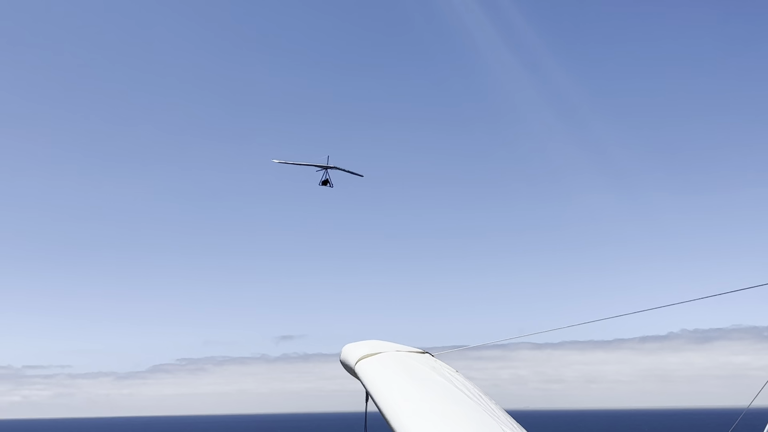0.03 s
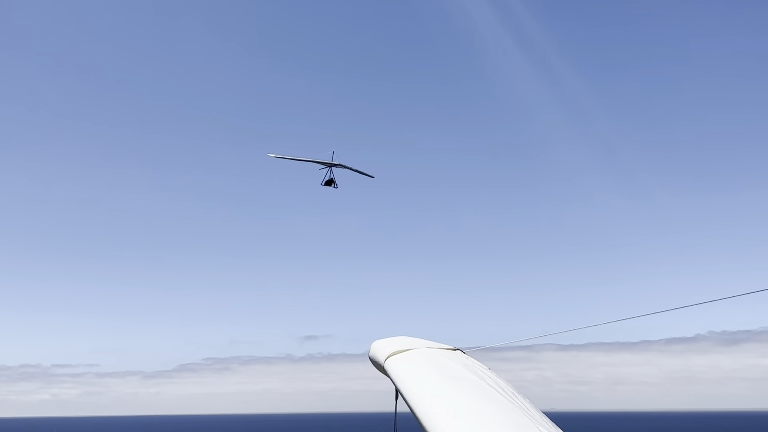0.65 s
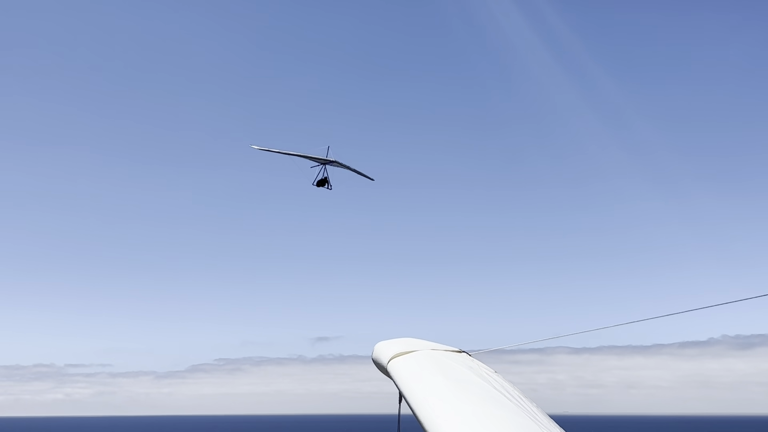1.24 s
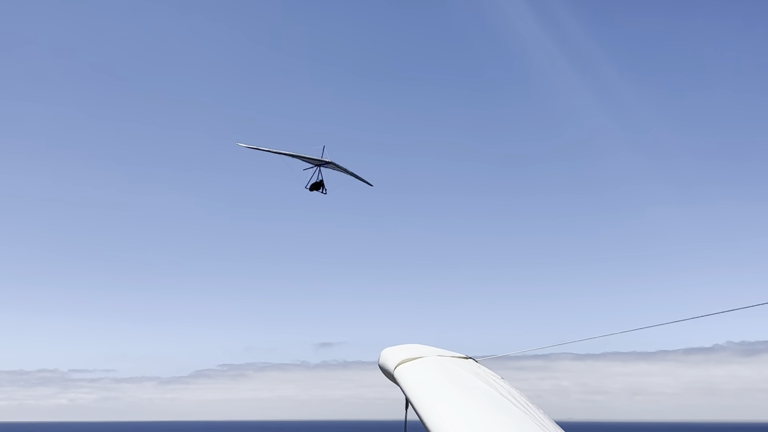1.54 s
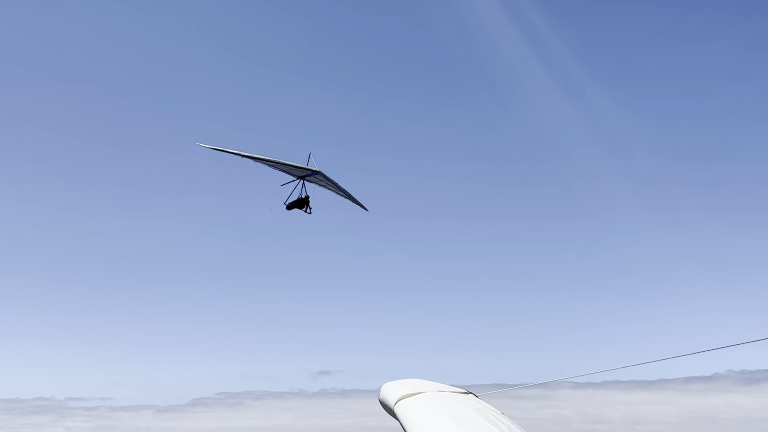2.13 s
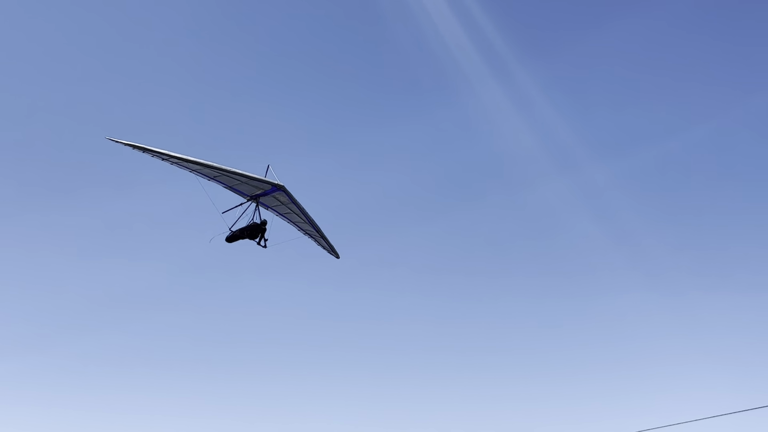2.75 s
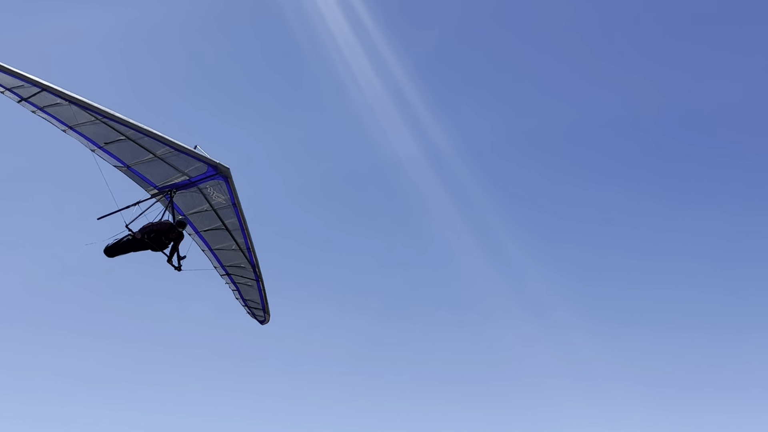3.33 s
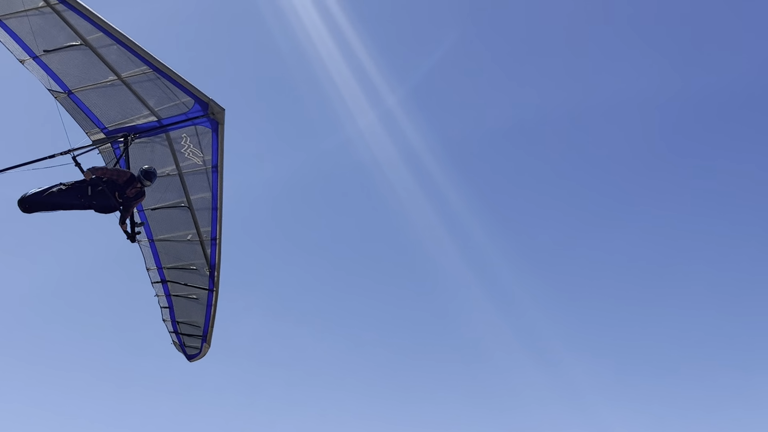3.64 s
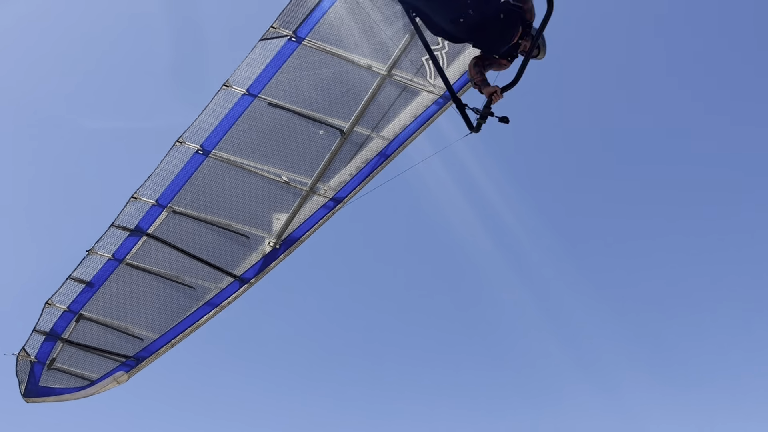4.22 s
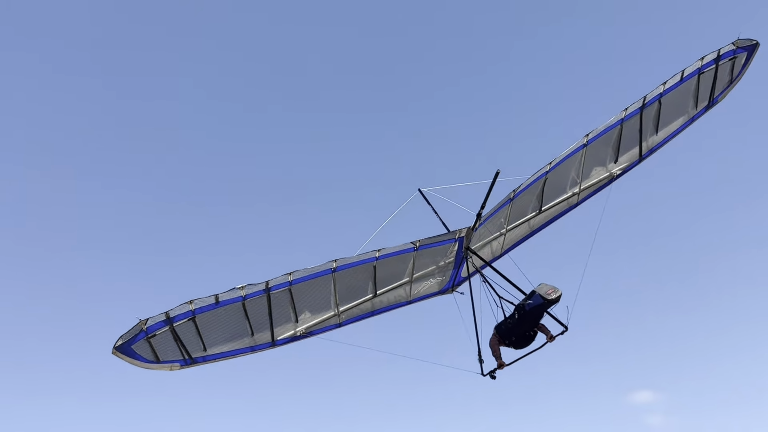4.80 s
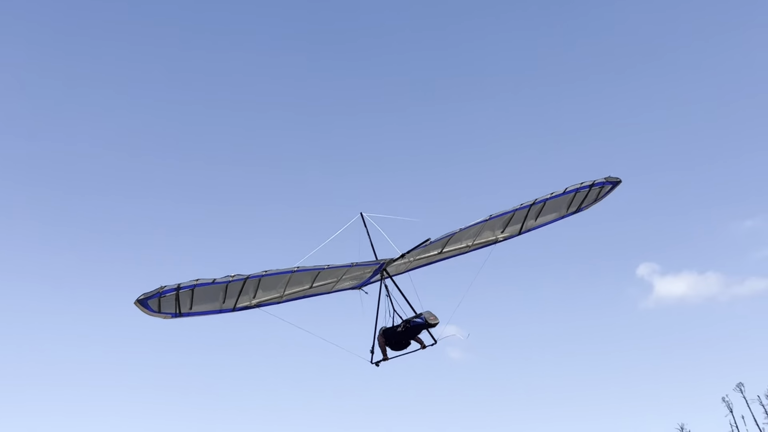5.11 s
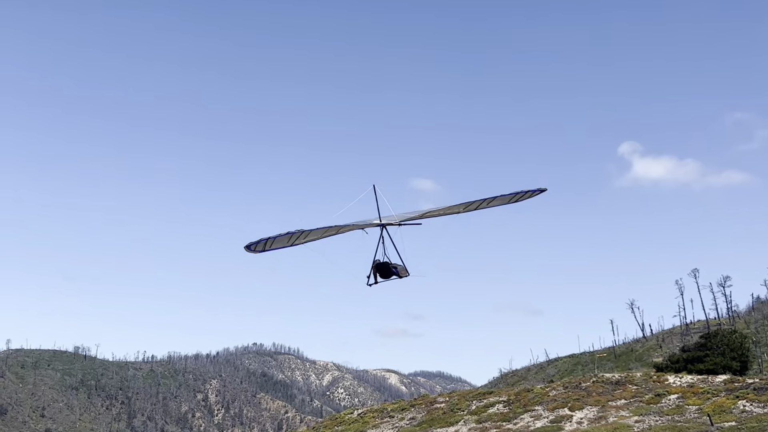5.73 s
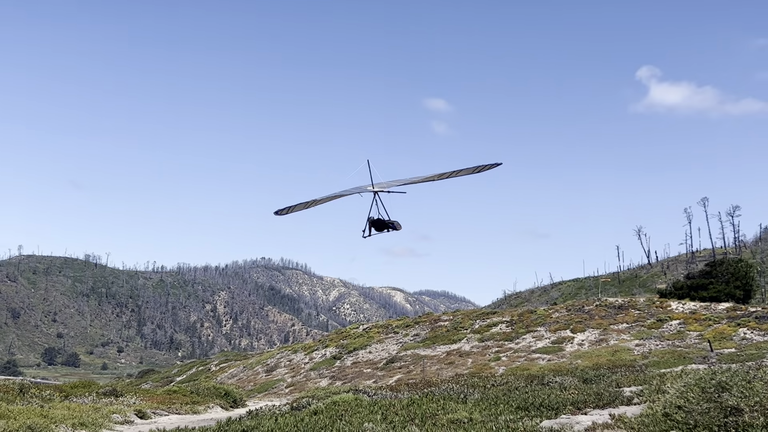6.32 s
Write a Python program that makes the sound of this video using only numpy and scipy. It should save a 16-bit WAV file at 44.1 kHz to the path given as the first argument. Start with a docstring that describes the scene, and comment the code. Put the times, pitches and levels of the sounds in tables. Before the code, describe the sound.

Wind buffets the microphone throughout, a low rumble with irregular flutters and soft thumps, over a very faint, steady wash of distant surf and wind in the scrub. The gusts are moderate at first, with a sharper one near 1.7 seconds. From about 2 seconds a thin, breathy whistle from a hang glider's wires slowly emerges. An airy rush from its sail swells from 3 seconds and peaks close overhead around 4 seconds, where the whistle is clearest and slides slightly down in pitch. Both fade by about 5.5 seconds, leaving a softer rush of trailing air. Faint, high ticks and chinks of loose fittings are scattered from 4.5 seconds on. The wind grows rougher after the pass and is the loudest sound, with hard slaps and short roars near 4.3, 4.9, 5.5 and 6 seconds, still blowing at the end around 6.5 seconds.

```python
"""Hang glider over a windy coast

A hang glider swoops low over a phone on a hillside and sails off inland. Its wires shed vortices
and sing, falling in pitch as it passes; its sail rushes and hisses; loose fittings chink.
Gusts buffet the microphone ports ever harder, over distant surf and wind in the scrub."""
import sys
import numpy as np
from scipy import signal
from scipy.fft import rfft, irfft, next_fast_len
from scipy.io import wavfile
from scipy.ndimage import uniform_filter1d

SR = 44100
rng = np.random.default_rng(int(sys.argv[2]) if len(sys.argv) > 2 else 0)


def wav_record(signal):
    """Record a signal, one row per channel, as 16-bit PCM in the file named by sys.argv[1]."""
    frames = np.transpose(np.atleast_2d(signal))
    bounded = np.clip(frames, -1, 1)
    # unit amplitude maps onto the largest positive 16-bit level
    quanta = np.round(bounded * 32767).astype(np.int16)
    wavfile.write(sys.argv[1], SR, quanta)


N = 289296
TIME = np.arange(N) / SR
OVERHEAD_S = 4
GUST_EDGE = 2.76  # swell shape: 2 is a bell, higher is more abrupt

# stereo width of sail and wake: (frequency [Hz], relative side level [dB])
GLIDER_WIDTH = [(60, -15.5), (700, -12), (1300, -12.5), (2400, -18.5), (4500, -9.5), (8500, -4),
                (15000, -5)]


def undb(db):
    """Decibels to gain."""
    return 10 ** (np.asarray(db) / 20)


def curves(table):
    """Columns of a timed table, interpolated per sample."""
    s, *columns = np.transpose(table)
    return [np.interp(TIME, s, c) for c in columns]


def unit(x):
    """Scale to rms 1."""
    return x / np.sqrt(np.mean(x ** 2))


def even(x, span_s):
    """Hold the rms near 1 over each span; faster grain stays."""
    span = int(span_s * SR)
    power = uniform_filter1d(np.atleast_2d(x) ** 2, span + 1).mean(axis=0)
    return x / np.sqrt(uniform_filter1d(power, span // 2 + 1) + 1e-18)


def walk(rate_hz):
    """Smooth random wander, rms 1."""
    span = max(int(SR / rate_hz), 1)
    drift = uniform_filter1d(rng.standard_normal(N), span, mode="wrap")
    return unit(uniform_filter1d(drift, span, mode="wrap"))


def swell(s, length_s, edge=2, t=TIME):
    """Rise and fall, peak 1 at s, within 3 dB for length_s."""
    return 2 ** (-np.minimum(np.abs(2 * (t - s) / length_s), 10) ** edge / 2)


def shaped(x, spectrum, size):
    """FFT filter through (Hz, dB) points, joined in log frequency."""
    hz, db = np.transpose(spectrum)
    bins_hz = np.maximum(np.fft.rfftfreq(size, 1 / SR), 1)
    gain = undb(np.interp(np.log(bins_hz), np.log(hz), db))
    return irfft(rfft(x, size) * gain, size)[..., :N]


def colour(x, spectrum):
    """Impose a spectrum, rms 1."""
    return unit(shaped(x, spectrum, next_fast_len(N + 8192)))


def dipped(x, dips):
    """Carve bell-shaped dips into the spectrum."""
    size = next_fast_len(N + 8192)
    bins_hz = np.fft.rfftfreq(size, 1 / SR)
    db = sum(dip_db * np.exp(-((bins_hz - hz) / width_hz) ** 2) for hz, width_hz, dip_db in dips)
    return irfft(rfft(x, size) * undb(db), size)[:N]


def stereo(mid, side, side_db):
    """Mid and side to left and right, rms 1."""
    return unit(mid + undb(side_db) * side * np.array([[1], [-1]]))


def air(side_db):
    """Stereo white noise."""
    return stereo(*rng.standard_normal((2, N)), side_db)


def ambience(spectrum, width):
    """Coloured noise with frequency-dependent stereo width."""
    mid, side = rng.standard_normal((2, N))
    return colour(stereo(mid, shaped(side, width, N), side_db=5.5), spectrum)


def burst(decay_s, low_hz, high_hz, side_db, order):
    """Short puff of band noise, mid peak 1."""
    age = TIME[:SR // 5] / max(decay_s, .001)
    puff = stereo(*rng.standard_normal((2, len(age))), side_db) * age * np.exp(-2 * age)
    band = signal.butter(order, [low_hz, min(high_hz, .45 * SR)], "band", fs=SR, output="sos")
    puff = signal.sosfilt(band, puff)
    return puff / np.abs(puff.mean(axis=0)).max()


def add(out, s, sound):
    """Mix a sound in at time s."""
    start = int(max(s, 0) * SR)
    out[:, start:start + sound.shape[1]] += sound[:, :N - start]


def airflow():
    """Rumble and flutter gains at the ports: gusts add their power to the breeze."""
    # steady wind: (time [s], rumble [dB], flutter [dB])
    breeze = [(0, -60, -78), (.5, -38.5, -62), (.7, -46.5, -58.5), (1.1, -40.5, -54), (1.3, -41.5, -54),
              (2.3, -35, -59), (3.0, -38, -63), (3.38, -40.5, -51), (3.6, -37, -44), (4.4, -35.5, -51),
              (4.9, -29, -49), (5.15, -35, -68), (5.45, -35, -51), (5.65, -27.5, -32), (5.9, -27, -36.5),
              (6.3, -28.5, -38), (6.56, -21, -33.5)]
    # gusts: (time [s], length [s], rumble [dB], flutter [dB])
    gusts = [(0.086, 0.033, -35, -59), (0.245, 0.06, -38, -45), (0.358, 0.06, -31.5, -41),
             (.865, 0.089, -36.5, -49.5), (0.968, 0.079, -40, -50), (1.076, 0.059, -38, -48),
             (1.49, 0.065, -34, -39.5), (1.705, 0.07, -40, -38.5), (1.753, 0.045, -30.5, -32),
             (1.874, 0.081, -32, -47), (2.111, 0.033, -32, -35.5), (2.206, 0.044, -34, -41),
             (2.32, 0.043, -51, -39), (2.445, 0.091, -28.5, -39), (2.597, 0.062, -31, -36),
             (2.719, 0.07, -32, -38.5), (3.175, 0.075, -32.5, -47.5), (3.478, 0.029, -31.5, -34.5),
             (3.7, 0.035, -29, -34), (3.79, 0.033, -38, -35), (3.91, 0.1, -30, -68),
             (4.046, 0.064, -32, -32.5), (4.163, 0.066, -28.5, -32.5), (4.248, 0.018, -34, -37),
             (4.315, 0.04, -24.5, -25.5), (4.6, 0.14, -24.5, -32), (4.78, 0.07, -23.5, -24.5),
             (4.885, 0.082, -20.5, -25), (4.987, 0.066, -25.5, -29.5), (5.095, 0.025, -27, -38),
             (5.259, 0.072, -28.5, -33.5), (5.399, 0.02, -32, -33.5), (5.515, 0.022, -18, -20),
             (5.56, 0.062, -23.5, -27), (5.833, 0.092, -25, -36.5), (6.026, 0.022, -25.5, -29),
             (6.131, 0.044, -23.5, -29.5), (6.395, 0.05, -30, -31.5)]
    t = TIME[::20]
    rumble_power, flutter_power = undb(curves(breeze))[:, ::20] ** 2
    for s, length_s, rumble_db, flutter_db in gusts:
        gust = swell(s, length_s, GUST_EDGE, t)
        rumble_power += (undb(rumble_db) * gust) ** 2
        flutter_power += (undb(flutter_db) * gust) ** 2
    return np.interp(TIME, t, np.sqrt(rumble_power)), np.interp(TIME, t, np.sqrt(flutter_power))


def wind(rumble_gain, flutter_gain):
    """Large eddies rumble on the ports, small ones flutter in clumps; both throb together."""
    # large eddies: (frequency [Hz], relative density [dB])
    rumble_spectrum = [(20, -25), (35, -14), (50, 3), (75, 3), (110, -1.5), (170, -6.5), (250, -12.5),
                       (400, -25), (800, -68), (1600, -78), (6000, -100)]
    # small eddies: (frequency [Hz], relative density [dB])
    flutter_spectrum = [(60, -24), (150, -3.5), (280, 3), (420, 0), (600, -8), (800, -18), (1100, -27),
                        (1400, -27.5), (1700, -50.5), (2500, -41.5), (6000, -79), (15000, -100)]
    # eddy size: (time [s], relative weight of the deepest rumble [dB])
    depth = [(0, 3.5), (1.8, 0.5), (2.9, 0.5), (3.4, -15), (4.4, -8), (4.8, -2.5), (6.56, -6.5)]
    depth_db, = curves(depth)
    swirl = colour(air(side_db=-9) * undb(2.66 * walk(110)), rumble_spectrum)
    deep = signal.sosfiltfilt(signal.butter(2, 70, fs=SR, output="sos"), swirl)
    rumble = even(swirl + (undb(depth_db) - 1) * deep, span_s=.066)
    clumps = undb(2.8 * walk(180))
    flutter = even(colour(air(side_db=-8) * clumps, flutter_spectrum), span_s=.12)
    throb = walk(36)
    return rumble * rumble_gain * undb(1.65 * throb) + flutter * flutter_gain * undb(3 * throb)


def surf():
    """Distant breakers and wind in the scrub: a near-steady wash."""
    # wash: (frequency [Hz], relative density [dB])
    spectrum = [(30, -1.5), (150, 2.5), (400, -16), (700, -14.5), (1100, -12), (1550, -14), (2100, -9.5),
                (3200, -14.5), (5000, -22), (8000, -27.5), (12000, -56.5), (15500, -42)]
    # stereo width: (frequency [Hz], relative side level [dB])
    width = [(60, -8.5), (350, 2.5), (700, 11), (1250, 3), (2300, -20), (5000, -6.5), (8500, -3.5),
             (15000, -11)]
    return ambience(spectrum, width) * undb(-55 + .5 * walk(.76) + .5 * walk(15))


def sing(pitch_hz, width_hz):
    """Vortex tone: narrow-band noise on a steady or moving pitch."""
    lowpass = signal.butter(2, width_hz / 2, fs=SR, output="sos")
    baseband = signal.sosfilt(lowpass, air(side_db=-17) + 1j * air(side_db=-13))
    carrier = np.exp(2j * np.pi * np.cumsum(pitch_hz * np.ones(N)) / SR)
    return even(np.real(baseband * carrier), span_s=.047)


def wires():
    """Wires shed vortices and sing, clearest overhead, where one locks into a pure note."""
    # main wires: (time [s], shedding pitch [Hz], level [dB])
    song = [(0, 1541, -76), (1.1, 1536, -66), (2.0, 1549, -60.5), (2.55, 1659, -57), (3.25, 1647, -51.5),
            (3.63, 1585, -48), (3.75, 1560, -42.5), (3.86, 1535, -42.5), (3.97, 1520, -42),
            (4.07, 1560, -41), (4.12, 1490, -39), (4.16, 1442, -40.5), (4.21, 1435, -42),
            (4.27, 1400, -43.5), (4.39, 1363, -43.5), (4.49, 1417, -46), (4.68, 1384, -47.5),
            (5.0, 1415, -52.5), (6.56, 1531, -84)]
    far_share, near_share = .17, .72  # clear tone's part of the power
    lock_s, lock_db = 4.15, -39.5
    hz, db = curves(song)
    clear = far_share + (near_share - far_share) * swell(OVERHEAD_S, length_s=.6)
    sway = walk(10.92)  # uneven air moves pitch and level together
    hz, db = hz * (1 + .0045 * sway), db + .9 * sway
    taut = sing(hz * (1 + .005 * walk(28)), width_hz=85)
    bundle = sing(hz * .99, width_hz=160)
    slanted = sing(hz * .905, width_hz=200)  # slanted wires see slower air
    broad = undb(-2) * bundle + undb(-1.5) * slanted
    lock_phase = 2 * np.pi * np.cumsum(hz * (1 + .008 * walk(50))) / SR
    lock_gain = undb(lock_db + 2.5 * walk(45)) * swell(lock_s, length_s=.095, edge=GUST_EDGE)
    locked = np.sqrt(2) * np.sin(lock_phase) * lock_gain
    return locked + undb(db) * (np.sqrt(clear) * taut + np.sqrt(1 - clear) * broad)


def sail():
    """Turbulence off sail and harness peaks overhead; soft swells of wind in the scrub share its hiss."""
    # wind in the scrub: (time [s], length [s], level [dB])
    hisses = [(.22, 0.81, -54.5), (1.584, 0.75, -55), (5.8, 0.087, -49)]
    # rush: (frequency [Hz], relative density [dB])
    spectrum = [(40, -19.5), (200, 22.5), (550, 25.5), (900, 19.5), (1300, 16), (1700, 14.5), (2000, 5.5),
                (3200, 4.5), (5000, -1.5), (7500, -2.5), (12000, -11), (15500, -12)]
    rush_db, approach_s, leave_s = -41, .72, .75
    pass_s = 2 * np.where(TIME < OVERHEAD_S, approach_s, leave_s)
    near = undb(rush_db) * swell(OVERHEAD_S, pass_s, edge=1.76)
    far = sum(undb(db) * swell(s, length_s) for s, length_s, db in hisses)
    return ambience(spectrum, GLIDER_WIDTH) * np.hypot(near, far) * undb(.97 * walk(53))


def eddy(hz, pan_db):
    """One vortex crossing the ports: about two pressure cycles, arriving sharply, then slowing."""
    rise_cycles, fall_cycles = .52, 1
    half = int(3 * SR / hz)
    cycles = np.arange(-half, half) * hz / SR
    envelope = np.exp(-(cycles / np.where(cycles < 0, rise_cycles, fall_cycles)) ** 2)
    phase = 2 * np.pi * (cycles - .17 * cycles ** 2) + rng.uniform(0, 2 * np.pi)
    ports = np.array([[1], [-1]]) / 2
    lag_rad = rng.uniform(-.19, 1) * min(hz / 350, 2)  # reaches one port first
    return envelope * np.cos(phase + lag_rad * ports) * undb(pan_db * ports)


def buffets(flutter_gain):
    """Strong eddies slap the ports; tiny ones pop at random, scaled by the flutter."""
    # strong eddies: (time [s], peak [dB], centre [Hz])
    strikes = [(.174, -41, 735), (.217, -31.5, 415), (.331, -24.5, 398), (0.358, -28, 520),
               (.389, -27.5, 350), (.454, -33, 700), (0.846, -26.5, 283), (0.867, -29.5, 410),
               (0.888, -27, 260), (0.979, -30, 353), (1.075, -32.5, 410), (1.375, -32, 210),
               (1.486, -21.5, 376), (1.5, -20.5, 312), (1.653, -26.5, 433), (1.732, -20.5, 270),
               (1.74, -28.5, 1100), (1.743, -15, 624), (1.751, -18, 104), (1.767, -17, 95),
               (1.861, -27.5, 229), (2.013, -30, 330), (2.04, -23, 160), (2.091, -26, 285),
               (2.152, -30, 945), (2.167, -26.5, 256), (2.203, -26, 304), (2.222, -24.5, 168),
               (2.302, -33, 258), (2.43, -22, 312), (2.513, -20.5, 415), (2.521, -20, 96),
               (2.545, -26, 680), (2.554, -23, 278), (2.578, -29, 600), (2.68, -22, 460),
               (2.945, -30.5, 260), (3.125, -26.5, 190), (3.188, -26, 222), (3.478, -22, 418),
               (3.638, -23.5, 300), (3.657, -24, 250), (3.689, -19.5, 430), (3.707, -22, 480),
               (3.716, -14, 162), (3.776, -22, 380), (3.786, -20.5, 320), (3.852, -23, 277),
               (4.045, -22, 290), (4.137, -22.5, 280), (4.178, -21, 270), (4.292, -19, 440),
               (4.305, -8.5, 330), (4.308, -8.5, 159), (4.588, -20, 700), (4.734, -14, 453),
               (4.757, -12, 490), (4.785, -15, 401), (4.821, -10, 397), (4.837, -22, 1650),
               (4.838, -7.5, 437), (4.845, -6.5, 134), (4.855, -12, 720), (4.874, -13.5, 820),
               (4.888, -12, 405), (4.969, -20, 600), (4.975, -14.5, 330), (5.22, -15, 200),
               (5.23, -17.5, 90), (5.246, -20, 290), (5.256, -19, 560), (5.267, -15, 400),
               (5.274, -14, 105), (5.286, -22.5, 246), (5.384, -21.5, 520), (5.517, -9, 500),
               (5.522, -13, 680), (5.524, -9, 232), (5.539, -17.5, 320), (5.558, -14.5, 128),
               (5.566, -13, 370), (5.579, -19, 400), (5.679, -18, 790), (5.689, -17.5, 240),
               (5.707, -25, 620), (5.729, -23.5, 860), (5.748, -19.5, 473), (5.774, -19.5, 600),
               (5.79, -18, 340), (5.801, -13, 400), (5.81, -21, 253), (5.831, -24, 726),
               (5.841, -16.5, 293), (5.874, -20.5, 900), (5.966, -21.5, 760), (6.045, -14, 667),
               (6.048, -7.5, 400), (6.097, -15, 540), (6.112, -23, 600), (6.123, -16.5, 623),
               (6.133, -16, 400), (6.141, -16, 300), (6.195, -13, 454), (6.217, -25, 670),
               (6.355, -20.5, 560), (6.388, -15.5, 290), (6.397, -18, 600), (6.413, -22, 322),
               (6.498, -21.5, 260)]
    pop_floor_db, pop_range_db = -13, 20.5
    when, size, pitch, place = rng.random(size=(160, 4)).T
    at = (when * (N - 1)).astype(int)
    pop_gain = flutter_gain[at] * undb(pop_floor_db + pop_range_db * size ** 2)
    pops = zip(TIME[at], pop_gain, 550 + 550 * pitch, 14 * (place - .5))
    # smaller eddies favour one port more
    pans_db_per_hz = (.5 + 1.5 * rng.standard_normal(len(strikes))) / 506
    slaps = [(s, undb(db), hz, pan * hz) for (s, db, hz), pan in zip(strikes, pans_db_per_hz)]
    out = np.zeros((2, N))
    for s, gain, hz, pan_db in [*pops, *slaps]:
        slap = eddy(hz, pan_db)
        add(out, s - slap.shape[1] / 2 / SR, gain * slap)
    return out


def blasts():
    """In the hardest gusts, eddies crowd into a short roar."""
    # hardest gusts: (time [s], length [s], level [dB])
    gusts = [(0.33, 0.041, -54), (1.745, 0.026, -37), (2.564, 0.07, -44.5), (4.316, 0.018, -28.5),
             (4.756, 0.048, -34), (4.839, 0.032, -20.5), (4.886, 0.019, -16.5), (4.907, 0.058, -38),
             (5.541, 0.049, -33), (6.525, 0.049, -31.5)]
    # roar: (frequency [Hz], relative density [dB])
    spectrum = [(120, 3), (330, 4), (550, 3), (800, 1), (1150, -4), (1400, -23), (1900, -32), (4000, -57),
                (15000, -87.5)]
    roar = even(colour(air(side_db=-4.5), spectrum), span_s=.017)
    return roar * sum(undb(db) * swell(s, length_s, GUST_EDGE) for s, length_s, db in gusts)


def whistles():
    """Other wires sound briefly as the air meets them squarely."""
    # wire notes: (time [s], length [s], pitch [Hz], width [Hz], level [dB])
    notes = [(.73, 0.04, 1450, 600, -56), (4.547, 0.077, 1596, 110, -44.5), (5.36, 0.19, 1652, 200, -53.5)]
    return sum(sing(hz, width_hz) * undb(db) * swell(s, length_s)
               for s, length_s, hz, width_hz, db in notes)


def rustle():
    """Brief airy rustle with an early gust."""
    band_hz, level_db = [11250, 14750], -80
    band = signal.butter(2, band_hz, "band", fs=SR, output="sos")
    hiss = unit(signal.sosfilt(band, air(side_db=-12)))
    return hiss * undb(level_db) * swell(s=.86, length_s=.08)


def ticks():
    """Small fittings tick as the wires shift under load."""
    # rigging ticks: (time [s], peak [dB], ring [Hz], width [Hz], decay [s])
    hits = [(1.928, -61, 13100, 500, .006), (5.089, -56, 12800, 500, 0.0046),
            (5.198, -46.5, 4770, 900, 0.012), (5.236, -56, 7600, 900, 0.0065),
            (5.278, -37.5, 7700, 650, 0.0037), (5.279, -54, 13000, 1400, .003)]
    out = np.zeros((2, N))
    for s, db, hz, width_hz, decay_s in hits:
        tick = burst(decay_s, hz - width_hz / 2, hz + width_hz / 2, side_db=-2, order=1)
        add(out, s, undb(db) * tick)
    return out


def wake():
    """Turbulent air rushes on behind the wing."""
    # wake strength: (time [s], level [dB])
    levels = [(0, -104), (3.8, -64), (4.5, -50), (5.3, -48), (5.98, -40.5), (6.27, -46.5), (6.39, -44),
              (6.56, -49)]
    # wake rush: (frequency [Hz], relative density [dB])
    spectrum = [(300, -21), (700, 4.5), (1050, 6.5), (1400, -1.5), (1700, -7.5), (2100, -14), (3000, -40),
                (6000, -46.5)]
    level_db, = curves(levels)
    return ambience(spectrum, GLIDER_WIDTH) * undb(level_db + 2 * walk(42))


def thin_wire():
    """One thin wire pipes briefly overhead."""
    peak_s, peak_db, pitch_hz, half_length_s = 4.188, -58, 13350, .014
    envelope = np.exp(-((TIME - peak_s) / half_length_s) ** 2)
    return undb(peak_db) * envelope * np.sin(2 * np.pi * pitch_hz * TIME)


def rattle():
    """Loose fittings chatter after the pass: a few clear chinks, many faint, all on the same modes."""
    # clear chinks: (time [s], strike level [dB])
    chinks = [(4.753, -62), (5.384, -62), (5.425, -62), (5.575, -63), (5.688, -61), (5.73, -65)]
    # fitting modes: (frequency [Hz], relative level [dB])
    modes = [(4860, -7), (7380, -3.5), (12600, -10)]
    start_s, span_s, faint_db, range_db, decay_s = 4.5, 2, -63, 15, .02
    faint = [(start_s + span_s * when, faint_db - range_db * drop)
             for when, drop in rng.random(size=(16, 2))]
    out = np.zeros((2, N))
    for s, db in chinks + faint:
        for hz, mode_db in modes:
            gain = undb(db + mode_db + 2 * rng.standard_normal())
            add(out, s, gain * burst(decay_s, hz * .975, hz * 1.025, side_db=-8, order=2))
    return out


def scene():
    """Glider and coast under the wind on the microphone."""
    rumble_gain, flutter_gain = airflow()
    glider = wires() + whistles() + sail() + wake() + ticks() + thin_wire() + rattle()
    port_noise = wind(rumble_gain, flutter_gain) + buffets(flutter_gain) + blasts()
    return port_noise + glider + surf() + rustle()


def record(dry):
    """The phone notches treble bands, differently in mid and side; the top is cut."""
    # treble notch, mid: (centre [Hz], half width [Hz], gain [dB])
    mid_dips = [(10040, 820, -24)]
    # treble notches, side: (centre [Hz], half width [Hz], gain [dB])
    side_dips = [(6700, 2000, -14), (13500, 1000, -29.5)]
    top_hz = 15600
    left, right = dry
    mid = dipped((left + right) / 2, mid_dips)
    side = dipped((left - right) / 2, side_dips)
    lowpass = signal.ellip(12, .2, 80, top_hz, fs=SR, output="sos")
    return signal.sosfilt(lowpass, np.array([mid + side, mid - side]))


dry = scene()
out = record(dry)
wav_record(out)
```